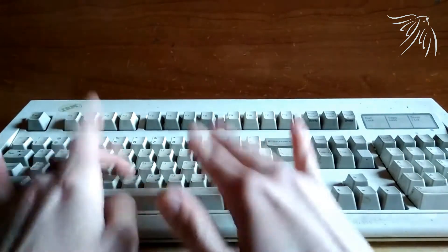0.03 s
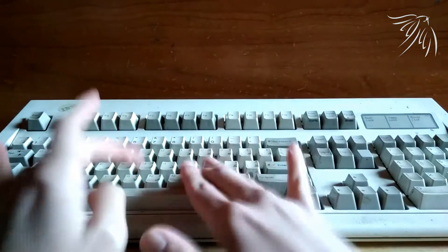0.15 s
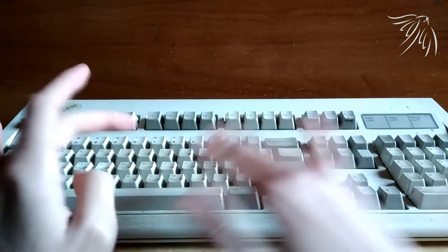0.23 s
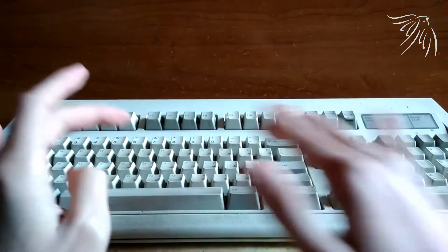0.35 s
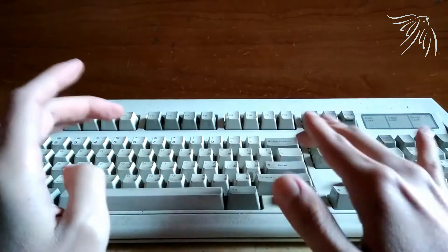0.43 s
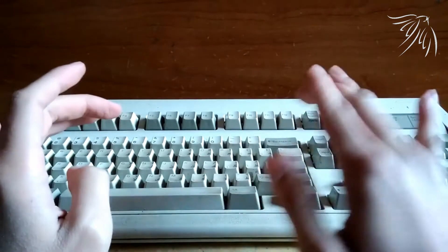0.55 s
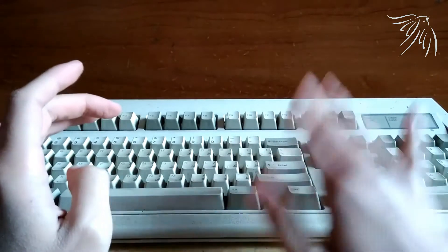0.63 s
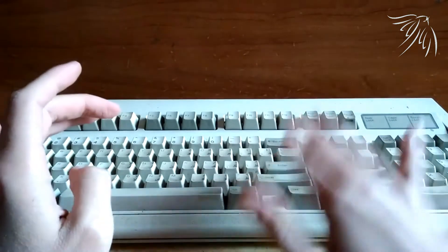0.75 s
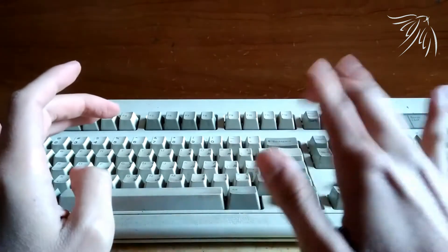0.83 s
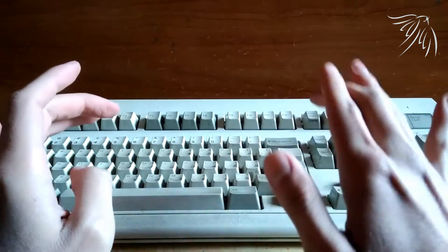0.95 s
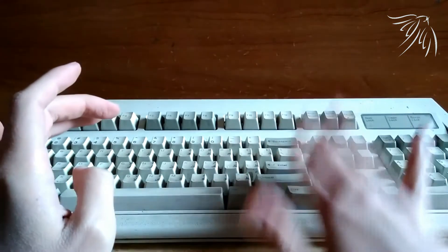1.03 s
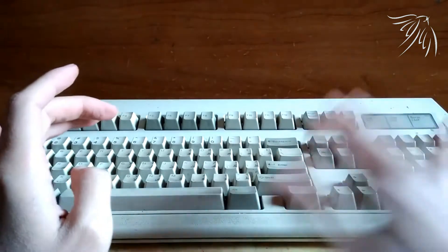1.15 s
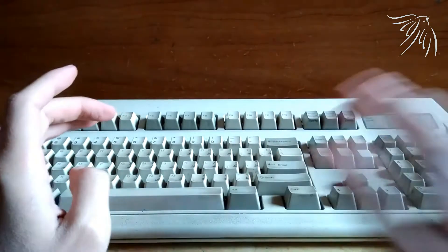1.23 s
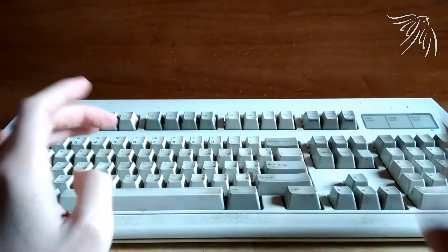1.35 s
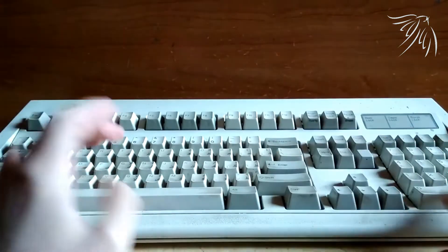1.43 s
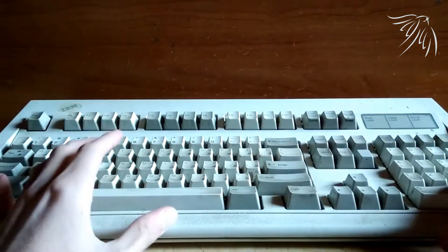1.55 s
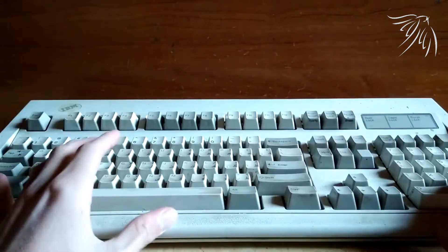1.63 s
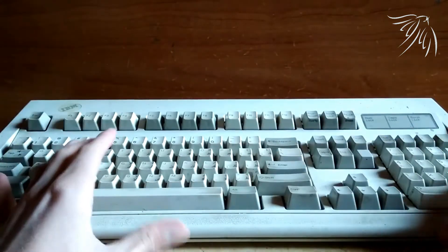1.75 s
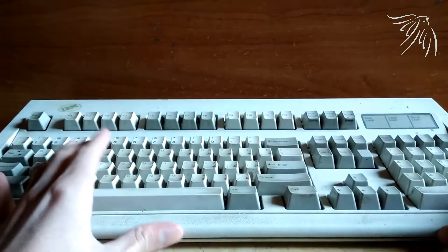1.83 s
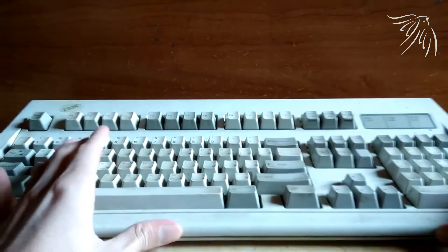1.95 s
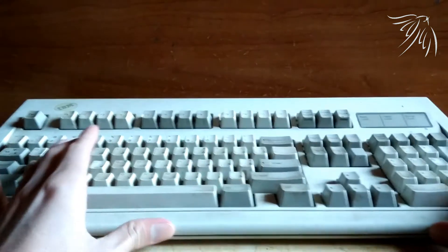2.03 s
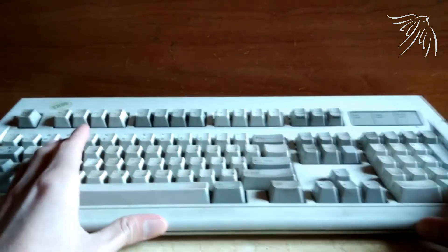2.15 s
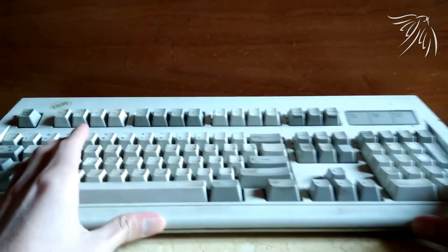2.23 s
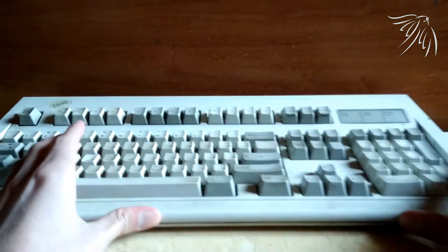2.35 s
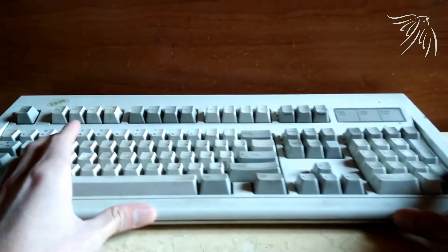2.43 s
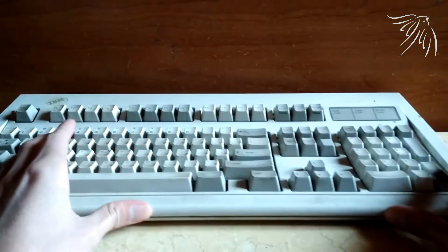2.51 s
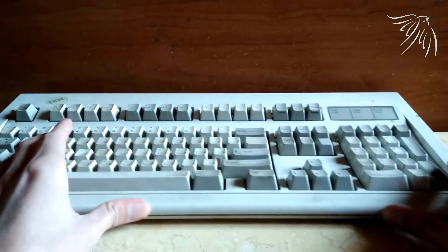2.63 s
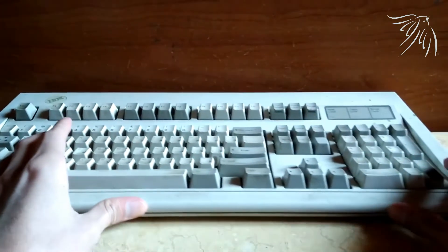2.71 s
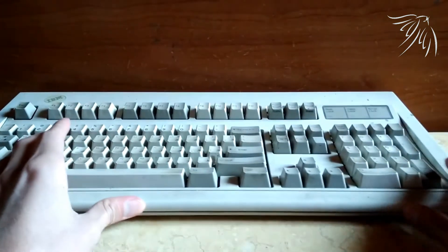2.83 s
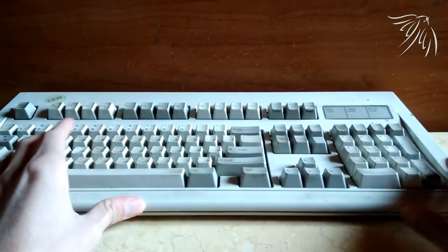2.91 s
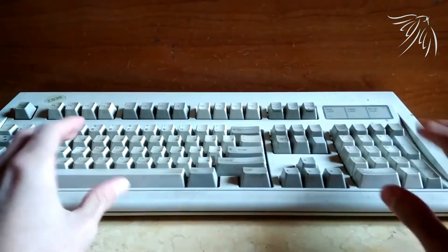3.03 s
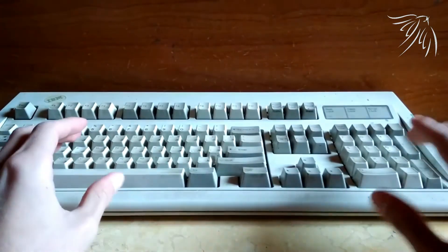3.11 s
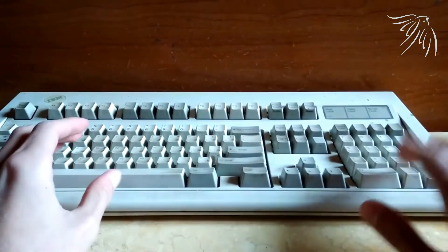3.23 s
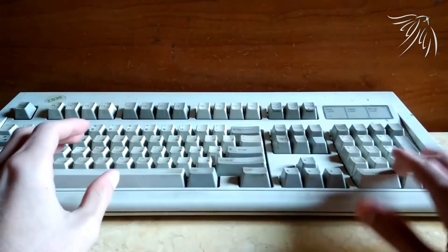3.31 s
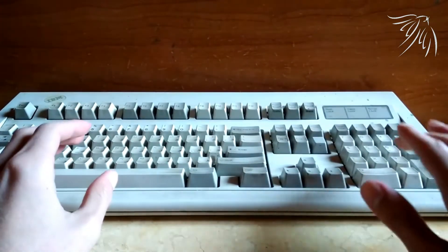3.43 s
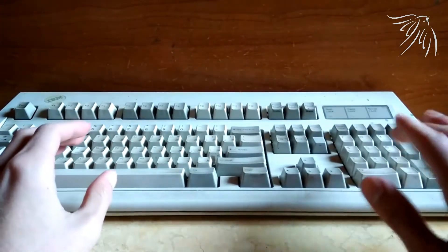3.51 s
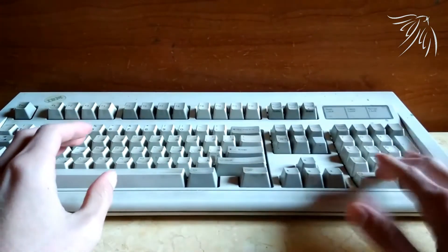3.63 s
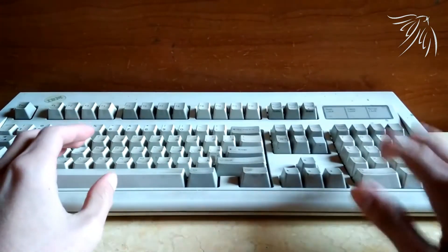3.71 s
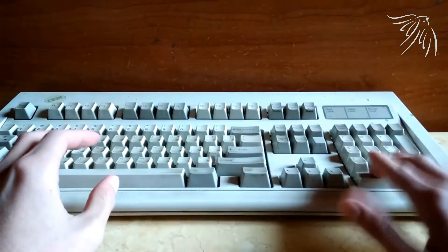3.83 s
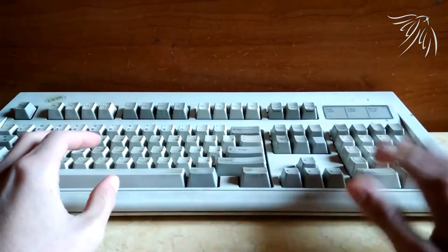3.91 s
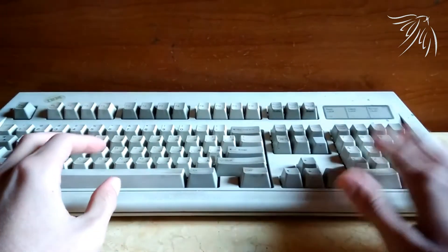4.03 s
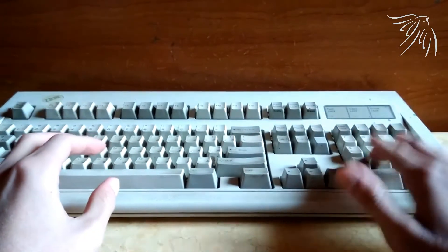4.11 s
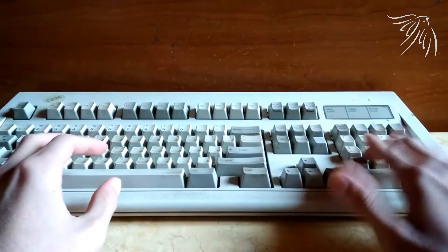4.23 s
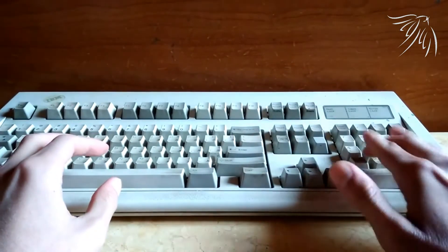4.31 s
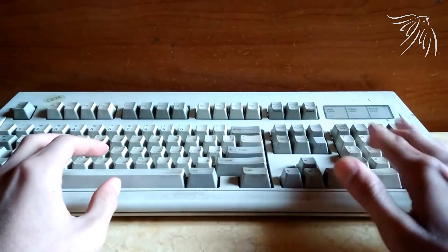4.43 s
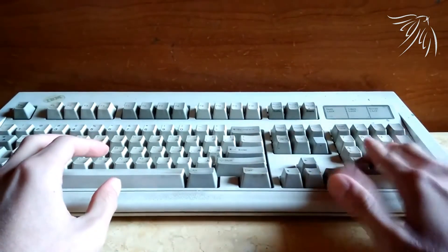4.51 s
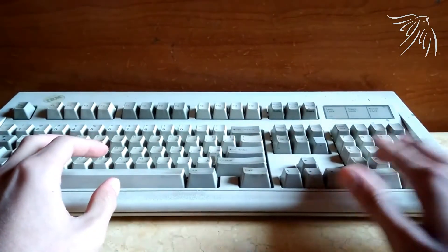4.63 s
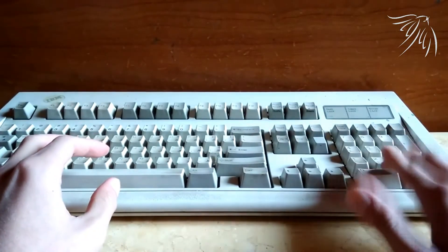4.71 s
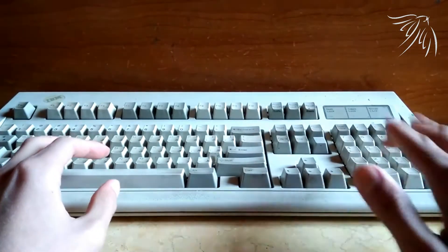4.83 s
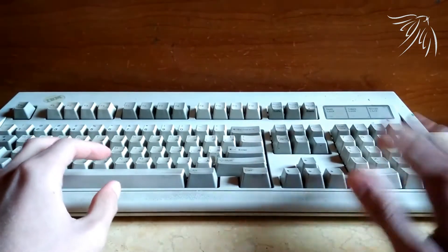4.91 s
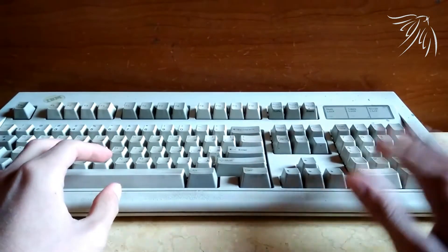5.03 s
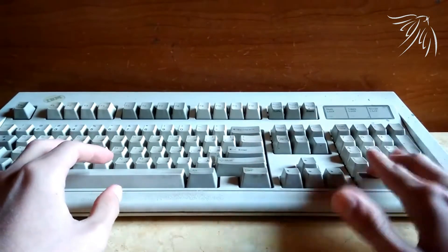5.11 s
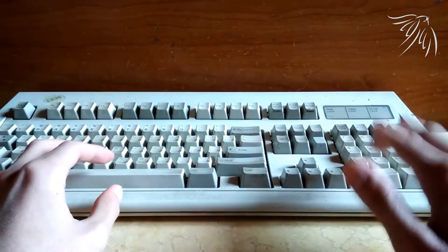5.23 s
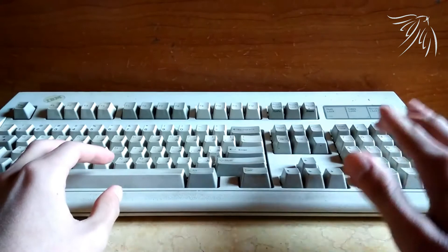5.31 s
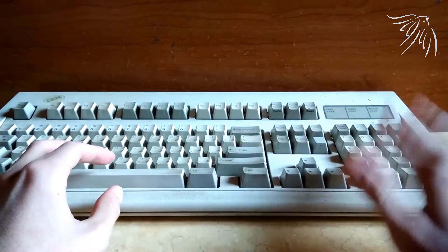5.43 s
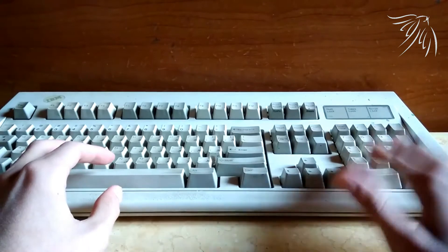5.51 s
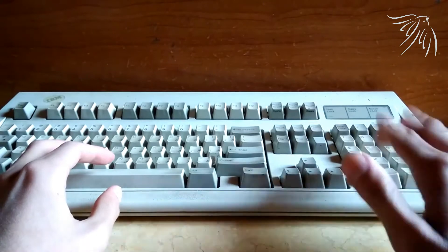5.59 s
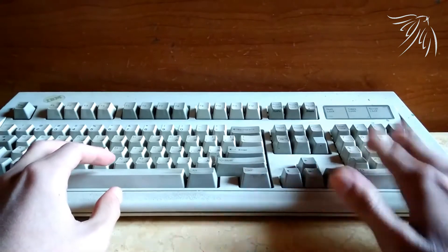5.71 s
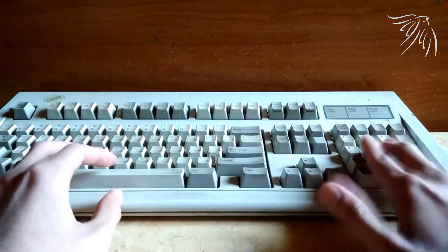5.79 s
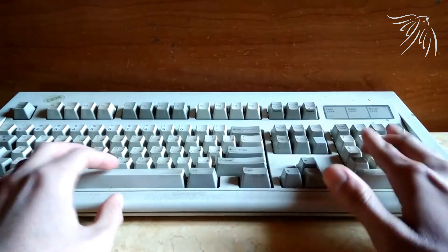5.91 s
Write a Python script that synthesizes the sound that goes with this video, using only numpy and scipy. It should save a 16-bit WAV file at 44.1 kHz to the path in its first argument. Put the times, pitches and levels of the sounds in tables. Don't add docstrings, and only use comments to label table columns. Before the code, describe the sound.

Close, loud keystrokes on a heavy spring-switch keyboard: a quick clattering cluster first, then two separate strokes, each a sharp clack down and a lighter clack up. A near-silent gap with small taps follows, then the keyboard is dragged over the desk with a grainy scrape and faint squeal. A bump ends it, and single keystrokes resume at an uneven, moderate pace. Small dry room, stereo phone lying on the same desk.

```python
import sys
import numpy as np
from scipy import signal
from scipy.fft import rfft, irfft
from scipy.io import wavfile
from scipy.ndimage import uniform_filter1d

SR = 44100
rng = np.random.default_rng(int(sys.argv[2]) if len(sys.argv) > 2 else 0)


def attenuation_scalar(level_db):
    decades = np.asarray(level_db, float) / 20
    return 10 ** decades


def waveform_to_disk(signal):
    frames = np.transpose(np.atleast_2d(signal))
    scaled = np.clip(frames, -1, 1) * 32767
    samples = np.round(scaled).astype(np.int16)
    wavfile.write(sys.argv[1], SR, samples)


N = 262836
TIME = np.arange(N) / SR
FREQ = np.fft.rfftfreq(N, 1 / SR)


def unit(x):
    return x / np.sqrt(np.mean(x ** 2))


def along(table, hz):
    points = np.array(table, float)
    return np.interp(np.log(hz + 1), np.log(points[:, 0]), points[:, 1])


def colour(x, table):
    return irfft(rfft(x) * attenuation_scalar(along(table, FREQ)), N)


def resonate(x, peaks):
    out = 0
    for hz, width, db in peaks:
        b, a = signal.iirpeak(hz, hz / width, SR)
        out = out + attenuation_scalar(db) * signal.lfilter(b, a, x)
    return out


def pair(alike_hz):
    mid, side = rfft(rng.standard_normal((2, N)))
    alike = 1 / (1 + (FREQ / alike_hz) ** 2)
    mid = mid * np.sqrt(1 + alike)
    side = side * np.sqrt(1 - alike)
    return unit(irfft(np.array([mid + side, mid - side]), N))


def flicker(rate, spread_db):
    hold = int(SR / rate)
    steps = np.repeat(rng.standard_normal(N // 8), hold)[:N]
    return attenuation_scalar(spread_db * uniform_filter1d(steps, hold))


def fades(s, db, rise_s, t60):
    spikes = np.zeros(N)
    np.add.at(spikes, (s * SR).astype(int), attenuation_scalar(db))
    fall = np.exp(-np.log(1000) / (t60 * SR))
    rise = np.exp(-1 / (rise_s * SR))
    falling = signal.lfilter([1], [1, -fall], spikes)
    return signal.lfilter([1 - rise], [1, -rise], falling)


def add(out, s, x):
    i = int(s * SR)
    room_left = out[..., i:i + x.shape[-1]]
    room_left += x[..., :room_left.shape[-1]]


# t/s, peak level/dB, cap f/Hz, crack and rattle level/dB re peak
BUCKLES = [(0.001, -22, 1515, -11.5, -1), (0.294, -3.5, 1898, -2.5, -19), (0.8414, -7, 1745, -15.5, -12),
           (1.2312, -15, 1493, -16.5, -14), (3.4118, -33.5, 2200, -10.5, -19), (3.7903, -27, 2340, 2, -21),
           (3.975, -22.5, 1370, 0, -12.5), (4.238, -25, 1492, 6, -21), (4.6543, -17.5, 1394, 1.5, -26.5),
           (5.099, -22, 1450, 2.5, -16), (5.296, -26.5, 1552, -1, -6), (5.6308, -13.5, 1316, -3.5, -22),
           (5.817, -17, 1530, -3, -14.5)]
LANDINGS = [(0.1195, -12.5, 1885, -6, -19), (0.1713, 4, 1820, -19.5, -32), (0.2995, -2.5, 1901, -18, -19.5),
            (0.8462, -2, 1346, -2, -17), (1.2392, -18.5, 1170, 8, -23), (3.4152, -37.5, 1960, 1.5, -14.5),
            (3.7975, 0.5, 2072, -4.5, -23), (3.9789, 0.5, 2202, -6.5, -28.5),
            (4.2484, -6.5, 2568, -3, -16.5), (4.3828, -24, 1530, -6.5, -17), (4.663, -2.5, 2458, 0, -19.5),
            (5.1034, 2, 2045, -4, -19), (5.3002, 3, 2072, -9.5, -28), (5.6365, 1.5, 1948, -10, -25),
            (5.8243, -3.5, 2608, -5, -21.5)]
RETURNS = [(0.2156, -16.5, 1300, -6, -25.5), (0.3741, -1, 1900, -12, -21.5),
           (0.9042, -3, 1574, -12.5, -23.5), (1.294, -5, 1705, -9, -25.5), (3.4832, -16.5, 2170, -19, -24),
           (3.8608, -4.5, 1800, -17, -24.5), (4.0459, -3.5, 1850, -13, -27),
           (4.3152, -14, 1850, -18.5, -39), (4.4666, -27, 1770, -25, -43), (4.774, -23.5, 1723, -25, -20),
           (5.167, -2, 1847, -12.5, -29.5), (5.3587, -2, 1830, -13.5, -29), (5.6937, 0, 1795, -16, -24.5),
           (5.8849, -12.5, 2370, -22, -43)]
# t/s, peak level/dB, cap f/Hz, crack level/dB re peak
KNOCKS = [(0.1168, -26, 1300, 1.5), (0.1232, -20.5, 943, -7.5), (0.1268, -24.5, 1930, 4.5),
          (0.1295, -26.5, 1500, 7.5), (0.1816, -5.5, 1773, -27.5), (0.218, -16.5, 1900, 3.5),
          (0.2212, -18.5, 915, -0.5), (0.2245, -29, 1900, -2), (0.304, -14, 1900, -16.5),
          (0.3092, -17.5, 1040, 9.5), (0.388, -37.5, 2983, -11.5), (0.9072, -19, 1718, -0.5),
          (0.9261, -29.5, 1233, 5), (1.2804, -30, 930, 3), (1.2425, -18, 667, -8),
          (1.2512, -22.5, 1290, -7), (1.2969, -14, 1330, -6), (1.312, -35, 1900, -8.5),
          (4.397, -31.5, 1480, -15.5), (4.4048, -28, 1520, -29), (4.409, -30.5, 1160, -22),
          (4.767, -37.5, 922, 12.5), (5.3373, -33, 2230, 7.5), (5.671, -23, 2160, -10),
          (0.1745, -9.5, 1796, -21.5), (0.195, -33.5, 1700, -6.5), (0.2035, -29, 1900, -11.5),
          (1.2335, -13, 1585, -6), (1.3045, -30.5, 4020, -10), (3.815, -26, 2220, -6.5),
          (3.833, -29.5, 2130, -8), (3.837, -31, 2170, -17.5), (4.384, -23.5, 914, -14),
          (5.65, -25, 1300, -14), (5.6545, -31, 1950, -13), (5.6735, -24, 2160, -12),
          (5.677, -36, 1900, -12), (5.704, -45, 930, -15), (5.8195, -20, 2340, -13),
          (0.8478, -8.5, 1040, -9.5), (5.1046, -10, 1608, -15.5), (5.301, -7.5, 1510, -15),
          (3.98, -7, 1657, -15.5), (5.8865, -15, 1450, -20), (3.7986, -11.5, 1200, -19),
          (4.6635, -16.5, 1315, -19.5), (5.8243, -18, 1295, -20.5)]
BRUSHES = [(1.0465, -48, 1250, 0), (1.774, -43.5, 610, -15), (1.9385, -37, 2700, -5),
           (1.9406, -41, 1495, 8), (1.944, -44.5, 850, -3.5), (1.763, -51.5, 1580, -9),
           (2.027, -53, 1500, 3), (1.956, -52, 764, -11.5), (2.0744, -49, 807, -18.5),
           (2.0828, -48.5, 680, 11.5), (3.1256, -49.5, 700, -11.5), (3.4189, -36, 1057, -14.5),
           (3.519, -42, 2150, -5.5), (4.4226, -43, 712, -28), (4.447, -38.5, 1800, -13),
           (4.4636, -36.5, 1500, -13.5), (4.4741, -40, 900, -13), (4.487, -53, 806, -16),
           (4.5227, -33, 1745, -19), (4.547, -43.5, 2000, -15), (4.5544, -40, 2400, -26),
           (4.558, -42, 970, -37.5), (4.8697, -39, 1060, -13.5), (4.8987, -42.5, 1010, -10.5),
           (4.9108, -46.5, 610, -18), (4.943, -45, 590, -8), (4.426, -52, 800, -13),
           (4.4215, -47.5, 2500, -14), (4.5205, -33, 2400, -8.5), (4.523, -48.5, 2900, -20),
           (4.5475, -48.5, 900, -17), (4.872, -42.5, 2500, -14.5)]
THUD_DB = [2, -23.5, -6.5, -4, 6.5]
CYCLES = [5, 3.6, 1.45, 3.6, 4.6]
SIDE_DB = [-0.35, 1.4, -1.2, -.4, -.4]
PLATE_DB = [-3, -8, -12, -4, -2]
# delay t/s, level/dB, f/Hz, crack level/dB, thud level/dB
LANDING_BOUNCE = (.009, -26.5, 761.5, -10.5, 2)
RETURN_BOUNCE = (.0095, -22.5, 821.5, -14, -3)
# delay t/s, level/dB, pitch multiple [1], crack level/dB, thud level/dB
STEM_CHIRP = (.0024, -13.5, 1.75, -10, -10.5)
SECOND_STOP = (.0028, -11, 1.5, -5.5, -4)
RETURN_ROCK = (.0012, -4, 1.05, -16, -20.5)


def impacts():
    buckle, landing, returning, knock, brush = range(5)
    rows = []

    def strike(s, db, hz, crack_db, thud_db, rattle_db, kind):
        rows.append((s, db, hz, crack_db, thud_db, rattle_db, CYCLES[kind], SIDE_DB[kind], PLATE_DB[kind]))

    def rebound(table, secondary, kind, follows_pitch):
        late, drop_db, pitch, crack_db, thud_db = secondary
        for s, db, hz, *_ in table:
            new_hz = hz * pitch if follows_pitch else pitch
            strike(s + late, db + drop_db, new_hz, crack_db, thud_db, -35.5, kind)

    for table, kind in ((BUCKLES, buckle), (LANDINGS, landing), (RETURNS, returning)):
        for s, db, hz, crack_db, rattle_db in table:
            strike(s, db, hz, crack_db, THUD_DB[kind], rattle_db, kind)
    rebound(LANDINGS, LANDING_BOUNCE, knock, False)
    rebound(LANDINGS, STEM_CHIRP, knock, True)
    rebound(RETURNS, RETURN_BOUNCE, knock, False)
    rebound(RETURNS, SECOND_STOP, knock, True)
    rebound(RETURNS, RETURN_ROCK, returning, True)
    for table, kind, rattle_db in ((KNOCKS, knock, -21), (BRUSHES, brush, -20.5)):
        for s, db, hz, crack_db in table:
            strike(s, db, hz, crack_db, THUD_DB[kind], rattle_db, kind)
    return np.transpose(rows)


def blows(landing_db, return_db, slope):
    rows = []
    for table, base_db in ((LANDINGS, landing_db), (RETURNS, return_db)):
        rows += [(s, base_db + slope * db) for s, db, *_ in table]
    return np.transpose(rows)


# f/Hz, level/dB
PLATE = [(720, -4), (1090, 0), (1350, -13), (1620, -3.5), (1940, -1.5), (2270, 0), (2590, -9.5),
         (3000, -6.5), (3600, -19.5)]
# t/s, lag of the left port [samples]
LAG = [
    (0, 5.5),
    (.6, 5),
    (.8, 3),
    (1.3, 3.5),
    (3.4, 0),
    (5.96, .3),
]


def caps(s, db, hz, cycles, side_db, plate_db):
    plate_t60_s, scatter_db = .017, 4
    out, t = np.zeros((2, N)), np.arange(1000) / SR
    chance = rng.uniform(-1.2, 1, size=(len(s), len(PLATE), 4))
    for start, gain, pitch, turns, pan, plate, rows in zip(s, attenuation_scalar(db), hz, cycles, side_db, plate_db, chance):
        lag = np.interp(start, *np.transpose(LAG)) / SR
        u = np.maximum(t - .0002 - np.array([[lag / 2], [-lag / 2]]), 0)
        ring = np.sin(2 * np.pi * pitch * u) * np.exp(-(u * pitch / turns) ** 2)
        late = 1 - np.exp(-(u / 0.00065) ** 2)
        fade = np.exp(-np.log(1000) * u / plate_t60_s) * late
        for (mode_hz, mode_db), (size, detune, turn, skew) in zip(PLATE, rows):
            distance_db = 10.0 * np.log2(mode_hz / pitch) ** 2
            reach_db = plate + mode_db + scatter_db * size - distance_db
            phase = mode_hz * (1 + 0.074 * detune) * u + 0.22 + 0.36 * turn
            phase = phase + skew * np.array([[.09], [-.09]])
            ring += attenuation_scalar(reach_db) * np.sin(2 * np.pi * phase) * fade
        port_gain = gain * attenuation_scalar(4.0 + np.array([[pan], [-pan]]) / 2)
        add(out, start, port_gain * ring * (1 - np.exp(-u / 0.00036)))
    return out


# f/Hz, level/dB per Hz
CRACK = [(2500, -24.5), (3500, 4), (4200, -0.5), (5000, 0.5), (7000, 0), (9000, -4), (13000, -12.5),
         (15500, -28.5)]
# f/Hz, bandwidth/Hz, level/dB
SPRING = [(3880, 51, 0), (5330, 64, -4), (6970, 370, -2), (3170, 90, 0.5)]


def spring_crack(s, db):
    crack = unit(colour(pair(1600), CRACK)) * flicker(1500, 3.1) * fades(s, db, 0.0012, 0.012)
    return crack + resonate(crack, SPRING)


# t/s, level/dB, T60/s
BUMPS = [
    (1.774, -33, 0.46),
    (1.831, -46, 1),
    (1.941, -33, 0.3),
    (3.126, -23, 0.15),
    (4.774, -14.5, 0.14),
    (4.869, -18.5, 0.21),
    (4.945, -31.5, 0.18),
]
# f/Hz, bandwidth/Hz, level/dB
CASE = [(203, 45, -17), (303, 40, -14), (400, 18, -17.5), (514, 51, -1.5), (750, 150, -4.5),
        (930, 21, -14.5)]


def case_thud(s, db):
    push = pair(2000) * (fades(s, db, .0015, .02) + fades(s, db - 13, .004, .14))
    flesh = signal.butter(3, [330, 950], "band", fs=SR, output="sos")
    soft = signal.sosfilt(flesh, pair(2000))
    push += soft * sum(fades(np.array([at]), bump_db, 0.00082, t60) for at, bump_db, t60 in BUMPS)
    return resonate(push, CASE)


# f/Hz, level/dB per Hz
RATTLE = [(200, -10.5), (304, -20.5), (487, -4), (1500, -6), (2300, -5), (3600, -5.5), (5000, -6.5),
          (6700, -7), (8620, -15.5), (13300, -28.5), (14100, -43), (15400, -80.5)]


def rattle_and_scrape(s, db, crack_db):
    loose = rfft(unit(colour(pair(1900), RATTLE)))
    dull = irfft(loose / (1 + (FREQ / 3000) ** 4), N)
    bright = (irfft(loose, N) - dull) * flicker(250, 3.) * flicker(40, 2.)
    dull = dull * flicker(350, 2.5) * flicker(80, 1.5)
    rattle = bright * fades(s, db + 0.55 * (crack_db + 0.5), 0.016, 0.19)
    rattle += dull * fades(s, db, 0.001, 0.19)
    stop_s, travel_db = blows(-39, -28, 0.8)
    travel, travel_s = np.zeros(N), .0095
    swell = np.geomspace(.25, 1, int(travel_s * SR))
    for stop, gain in zip(stop_s, attenuation_scalar(travel_db)):
        add(travel, stop - travel_s, gain * swell)
    return rattle + (dull + bright) * travel


def keys():
    s, db, hz, crack_db, thud_db, rattle_db, cycles, side_db, plate_db = impacts()
    bang = caps(s, db, hz, cycles, side_db, plate_db)
    crack = spring_crack(s, db + crack_db)
    thud = case_thud(s, db + thud_db + 9.5)
    return bang + crack + thud + rattle_and_scrape(s, db + rattle_db, crack_db)


# t/s, peak level/dB, f/Hz
TICKS = [(0.0335, -39, 890), (0.0484, -40, 796), (0.156, -43, 947), (0.1815, -21.5, 1020),
         (0.1826, -26.5, 2850), (0.195, -31.5, 1744), (0.2737, -38.5, 818), (0.3081, -17.5, 1650),
         (0.3357, -25, 2140), (0.3481, -40, 925), (0.3595, -37.5, 867), (0.9, -27, 970),
         (1.3116, -26, 2024), (1.3325, -34.5, 2131), (1.3357, -40.5, 5180), (3.8331, -42.5, 1098),
         (3.8471, -35, 1162), (3.8965, -37, 1399), (4.0164, -33, 3079), (4.0347, -40.0, 904),
         (4.2692, -38, 1571), (4.4049, -32, 1098), (4.4683, -39.5, 861), (4.6719, -35, 647),
         (4.777, -42.5, 3639), (5.1225, -28.5, 5030), (5.1436, -29, 4306), (5.1437, -25, 2131),
         (5.1532, -37, 840), (5.2241, -41.0, 824), (5.319, -25.5, 1851), (5.3373, -24.5, 3186),
         (5.3897, -37, 818), (5.3943, -37, 2088), (5.4177, -45, 1614), (5.6534, -27.0, 1873),
         (5.6727, -19, 2180), (5.7292, -34.0, 1851), (5.7365, -40, 775), (5.7512, -38.0, 882),
         (5.7647, -42.0, 1701), (5.906, -35, 1507)]


def ticks():
    s, db, hz = np.transpose(TICKS)
    same = np.ones(len(s))
    return caps(s, db, hz, 5.1 * same, -.4 * same, -8.5 * same)


def ringing(s, db, hz, modes, rise_s, spread, scatter):
    longest = max(t60 for _, _, t60 in modes)
    out, t = np.zeros((2, N)), np.arange(int(min(1, 1.2 * longest) * SR)) / SR
    chance = rng.uniform(-0.77, 1, size=(len(s), len(modes), 3))
    for start, gain, pitch, rows in zip(s, attenuation_scalar(db), hz, chance):
        for (multiple, mode_db, t60), (turn, detune, skew) in zip(modes, rows):
            phase = pitch * multiple * (1 + spread * detune) * t + scatter * turn
            phase = phase + np.array([[.04], [-.04]]) * skew
            envelope = np.exp(-np.log(1000) * t / t60) * (1 - np.exp(-t / rise_s))
            add(out, start, gain * attenuation_scalar(mode_db) * np.sin(2 * np.pi * phase) * envelope)
    return out


# t/s, thump level/dB
THUMPS = [
    (0, -34),
    (0.3, -41),
    (0.849, -32),
    (0.902, -37.5),
    (1.288, -36),
    (4.387, -40),
    (4.87, -40.5),
]
# f/Hz, level/dB, T60/s
DESK = [(57.4, -2, 0.5), (70.6, -3, 0.27), (48, -9, 0.35), (176.6, -10, 0.3), (119, -10.5, 0.11)]


def desk_boom():
    s, thump_db = np.hstack([blows(-36.5, -45, 0.61), np.transpose(THUMPS)])
    return ringing(s, thump_db + 7.0, np.ones(len(s)), DESK, 0.051, 0.019, 0.42)


# t/s, level/dB, f/Hz
PLUCKS = [
    (0, -47, 716),
    (.378, -40.5, 697.5),
    (.906, -51.5, 714),
    (1.3, -58, 707),
    (3.485, -63, 732),
    (4.048, -50, 702),
    (5.17, -53.5, 731.5),
    (5.36, -50, 714),
    (5.7, -60, 715),
]
# multiple of its pitch [1], level/dB, T60/s
WIRE = [(1, 0, 1.1), (.994, 10, .22), (1.0232, -10, .9), (2.025, -9, .55), (1.322, -3, .25)]


def stabiliser_wire():
    return ringing(*np.transpose(PLUCKS), WIRE, .004, 0, 0)


# t/s, level/dB, f/Hz
PINGS = [(0.31, -23, 4400), (0.38, -21.5, 3500), (0.8515, -13, 4400), (1.3037, -25.5, 4100),
         (3.83, -23, 4000), (3.487, -46, 4000), (4.73, -25.5, 3500), (5.109, -22, 4000), (5.141, -23, 2200),
         (5.317, -23.5, 4500), (4.675, -24.5, 6900), (4.055, -34, 6900), (1.297, -19.5, 5500),
         (5.36, -28, 8300), (5.338, -34.5, 2200), (5.697, -27, 6200), (3.797, -16.5, 6890),
         (5.8245, -18.5, 6900)]
# multiple of the ping pitch [1], level/dB, T60/s
COIL = [(1, 2, 0.025), (1.035, -2.5, .025)]


def spring_pings():
    return ringing(*np.transpose(PINGS), COIL, 0.0004, 0, 1)


def while_on(table):
    s, *columns = np.transpose(table)
    db, *rest = (np.interp(TIME, s, column) for column in columns)
    inside = (TIME > s[0]) & (TIME < s[-1])
    return np.where(inside, db, -140), *rest


# t/s, level/dB, weight on the feet [dB of treble lost], squeal of the middle modes/dB
DRAG = [
    (2.07, -57.5, 3, -3),
    (2.16, -45.5, -2, -2.5),
    (2.42, -46, -5.5, 0),
    (2.5, -41, 1.5, 4.5),
    (2.62, -36, 9, 0.5),
    (2.75, -40, 15.5, -5),
    (2.86, -35, 13.5, -2.5),
    (2.95, -46, 5.5, 4.5),
    (2.98, -57, 11.5, 6.5),
    (3.09, -71.5, 12.5, 0.5),
]
# f/Hz, bandwidth/Hz, level/dB
DRAG_LOW = [(424, 43, -1), (509, 94, 9), (700, 185, 10), (857, 130, 6.5)]
# f/Hz, bandwidth/Hz, level/dB
DRAG_MID = [(1135, 170, 2), (1450, 250, -10), (1635, 410, 11.5), (1900, 450, 2)]
# f/Hz, bandwidth/Hz, level/dB
DRAG_HIGH = [(2256, 108, 3.5), (2326, 540, 4.5), (2610, 126, 3), (2948, 250, -1)]
# f/Hz, bandwidth/Hz, level/dB
DRAG_HEAVY = [(506, 28, 0.5), (655, 35, 1), (860, 59, 1.5), (1149, 50, 8), (1700, 80, -4.5),
              (1960, 65, -8.5), (2200, 44.8, -6)]
LIGHT_DB = [1, -2]
DULLING = [1, 0.99]
# f/Hz, level/dB per Hz
HISS = [(3400, -13.5), (4000, -0.5), (4700, 2), (5400, 3), (6000, 0.5), (6650, 0.5), (7400, 0), (9000, -4),
        (13000, -16.5), (15500, -23)]
# f/Hz, bandwidth/Hz, level/dB
HISS_PEAKS = [(5540, 200, -5.5), (6620, 120, -1.5), (3860, 130, 3)]


def drag():
    db, weight, mid_db = while_on(DRAG)
    high_db, hiss_db = (light - loss * weight for light, loss in zip(LIGHT_DB, DULLING))
    layers = 0
    for peaks, share_db in ((DRAG_LOW, 0), (DRAG_MID, mid_db), (DRAG_HIGH, high_db)):
        slips = pair(1200) * flicker(900, 3.) * flicker(60, 1.)
        layers = layers + attenuation_scalar(share_db) * unit(resonate(resonate(slips, peaks), peaks))
    layers = layers + attenuation_scalar(-11 + 0.28 * weight) * unit(resonate(slips, DRAG_HEAVY))
    hiss = unit(colour(pair(900), HISS)) * flicker(200, 1.5) * flicker(25, 1.)
    hiss = hiss + resonate(hiss, HISS_PEAKS)
    return attenuation_scalar(db) * (layers + attenuation_scalar(hiss_db) * hiss)


# t/s, level/dB, duration/s
MOVES = [
    (0.445, -52.5, 0.022),
    (1.365, -58.5, 0.18),
    (1.646, -72, 0.45),
    (2.964, -66.5, 0.13),
    (3.532, -62, 0.018),
    (4.789, -61.5, 0.15),
]
# f/Hz, level/dB per Hz
RUSTLE = [(1500, -10), (4000, -2), (7000, 7), (10000, 2), (13500, -6.5), (15000, -20)]


def rustle():
    envelope = 0
    for s, db, lasts in MOVES:
        settle_db = 129.5 * np.maximum(TIME - s - lasts, 0)
        envelope = envelope + (TIME > s) * attenuation_scalar(db - settle_db)
    return unit(colour(pair(900), RUSTLE)) * envelope


# f/Hz, T60/s
ROOM_T60 = [(150, 0.073), (500, 0.42), (1500, 0.27), (4000, 0.38), (10000, 0.17)]


def room(x):
    t = np.maximum(TIME - .006, 0)
    spectrum, echo = rfft(pair(700)), 0
    for hz in 100 * 2. ** np.arange(8):
        octave = np.exp(-(np.log2((FREQ + 1) / hz) / .65) ** 2)
        decay = np.exp(-np.log(1000) * t / along(ROOM_T60, hz))
        echo = echo + irfft(spectrum * octave, N) * decay
    echo = (echo * (1 - np.exp(-t / 0.024)))[:, :SR]
    return signal.fftconvolve(x.mean(axis=0)[None], echo, axes=1)[:, :N]


# f/Hz, level/dB
HOUSING = [(3000, -2.5), (4900, -4.5), (6000, -2.5), (6750, -0.5), (7600, -2.5), (8500, -4), (12000, -1.5)]
# f/Hz, level/dB
PORTS = [(100, -1), (2000, -3), (5000, -2), (6800, 9), (8000, 2.5), (9000, -8), (14000, -9.5)]


def phone(airborne, structure_borne):
    heard = colour(airborne, HOUSING) + structure_borne
    tilt = attenuation_scalar(along(PORTS, FREQ) / 2)
    return irfft(rfft(heard) * np.array([tilt, 1 / tilt]), N)


# f/Hz, level/dB per Hz
FLOOR = [(15, -44), (25, -17), (44, -5), (64, -7), (110, -4.5), (164, -8), (198, -6), (233, -6), (330, -16),
         (420, -15.5), (1370, -26.5), (3500, -33), (7000, -33), (13500, -29.5), (15400, -44.5)]


def background():
    floor_db = -62
    return attenuation_scalar(floor_db) * unit(colour(pair(210), FLOOR)) * flicker(78, 0.86)


def scene():
    near = keys() + drag() + rustle() + ticks()
    airborne = near + attenuation_scalar(-42.5) * room(near)
    structure_borne = desk_boom() + stabiliser_wire() + spring_pings()
    return phone(airborne, structure_borne) + background()


def low_pass(x):
    return signal.sosfilt(signal.butter(12, 15570, fs=SR, output="sos"), x)


def record(dry):
    band = signal.sosfilt(signal.butter(3, 38, "high", fs=SR, output="sos"), dry)
    band = signal.sosfilt(signal.ellip(6, .5, 40, 14100, fs=SR, output="sos"), band)
    limited = band / (1 + band ** 8) ** (1 / 8)
    return low_pass(limited)


dry = scene()
out = record(dry)
waveform_to_disk(out)
```